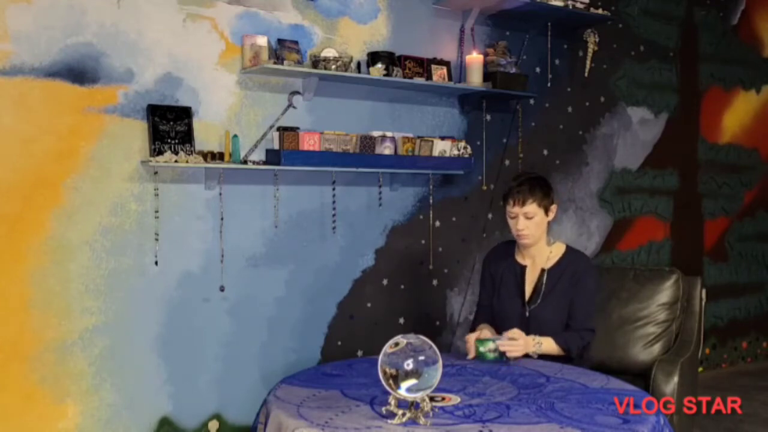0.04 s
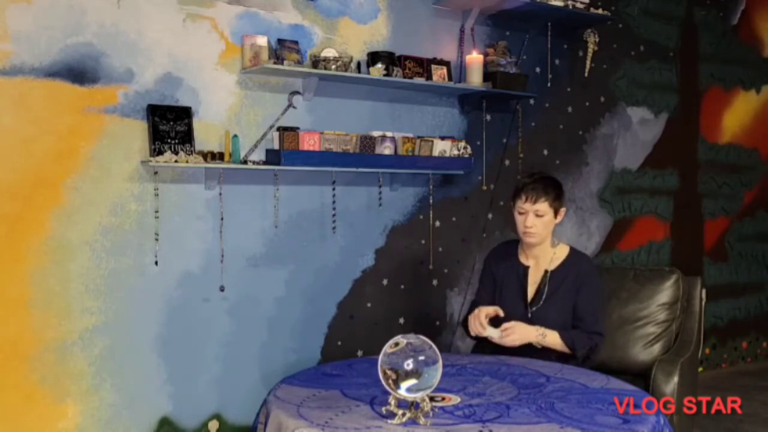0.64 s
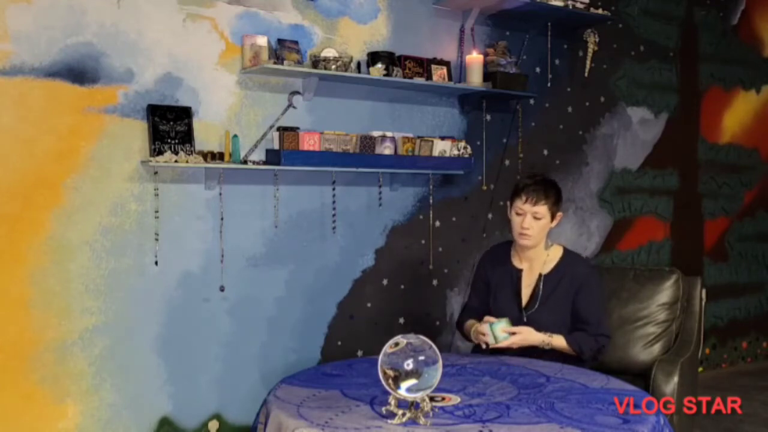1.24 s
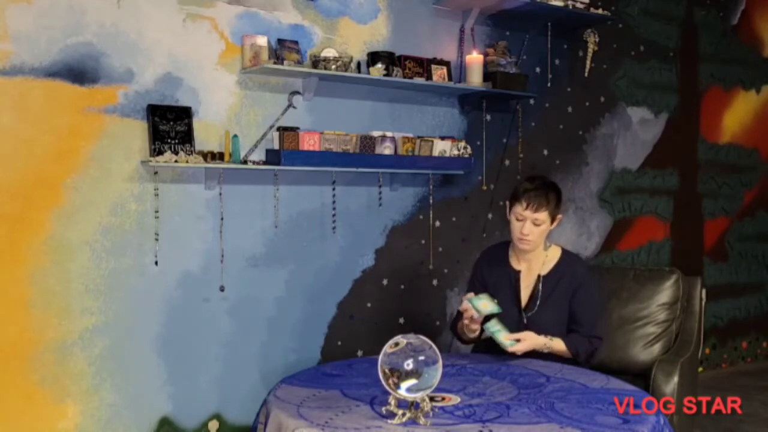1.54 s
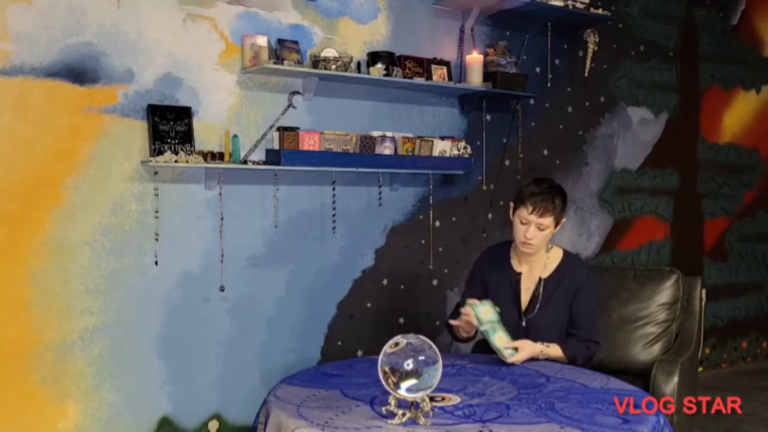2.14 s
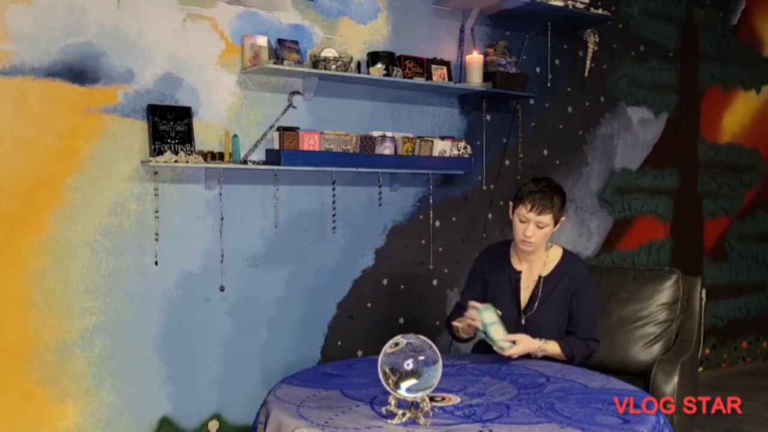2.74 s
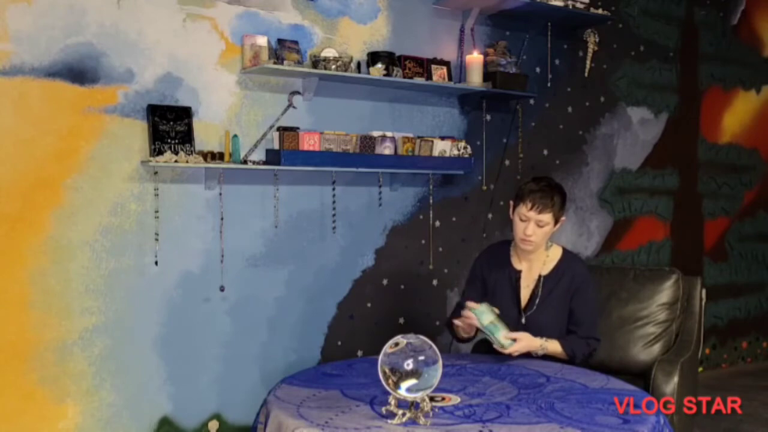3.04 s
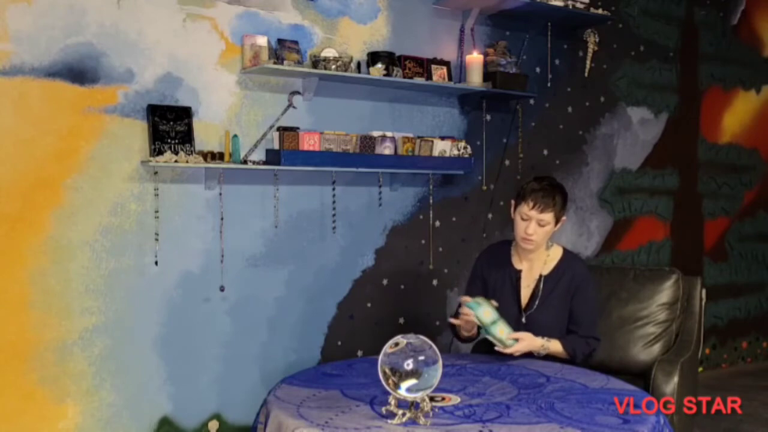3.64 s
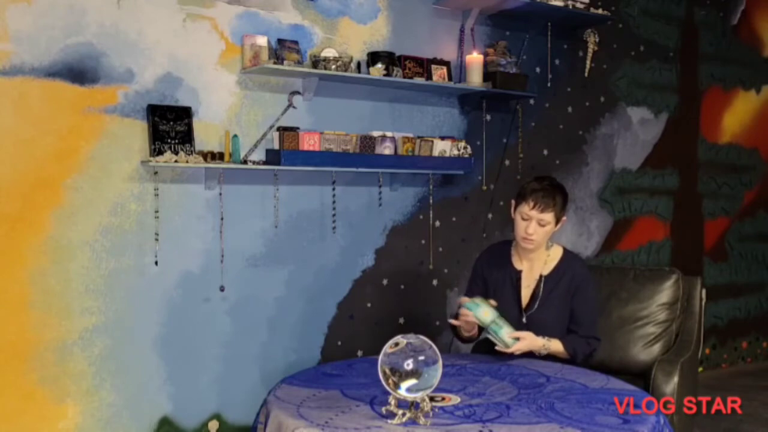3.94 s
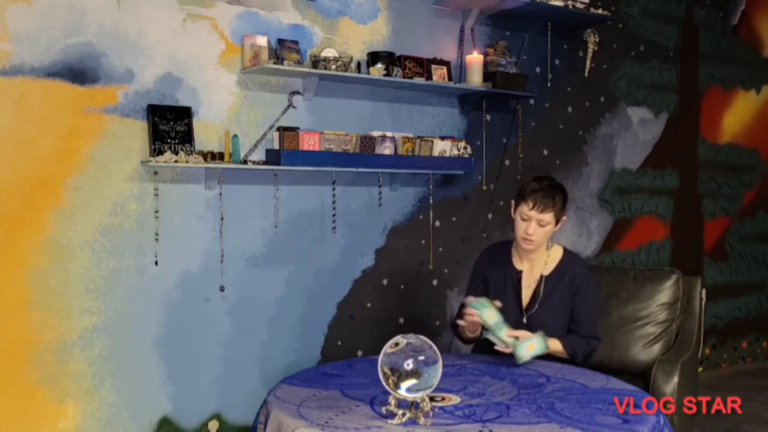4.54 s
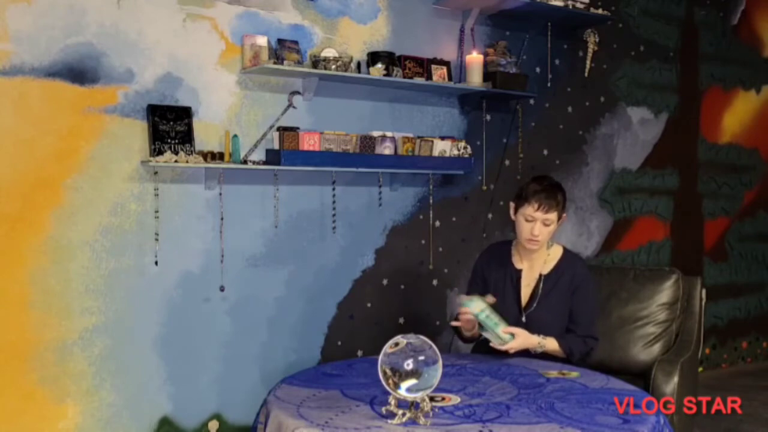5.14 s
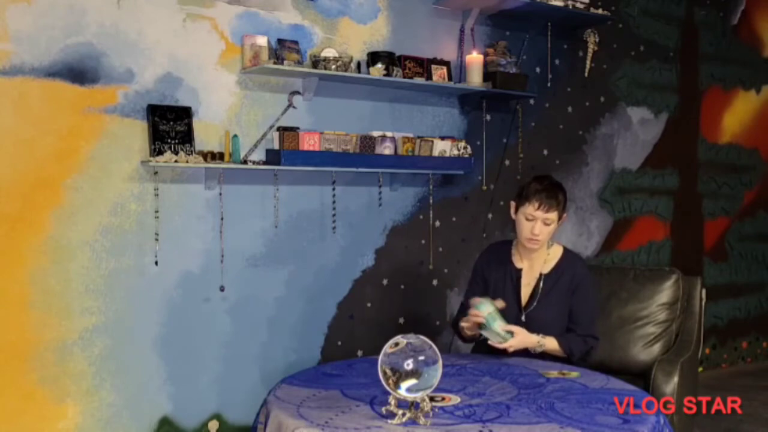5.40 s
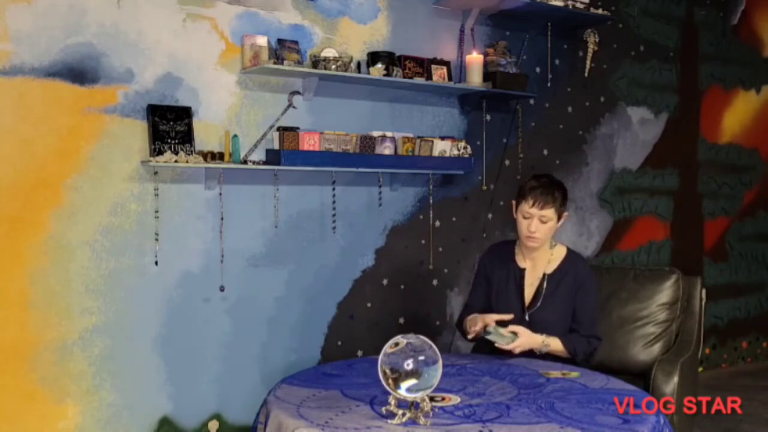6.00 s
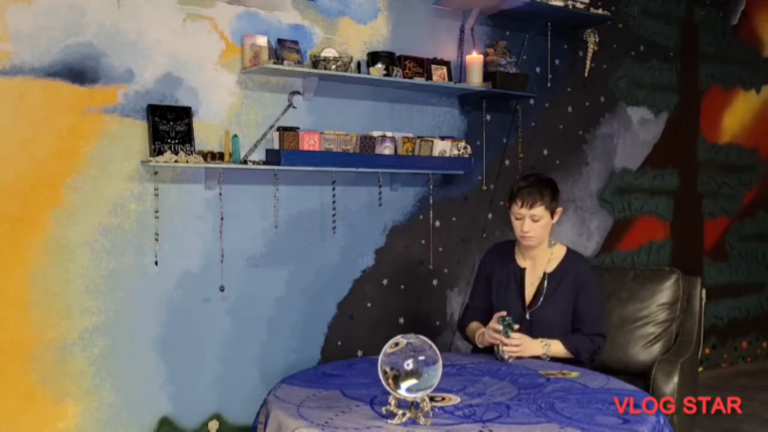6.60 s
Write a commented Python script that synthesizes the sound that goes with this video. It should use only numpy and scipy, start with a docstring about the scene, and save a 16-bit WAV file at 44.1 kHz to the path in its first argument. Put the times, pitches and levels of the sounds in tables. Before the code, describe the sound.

A deck of large cards is knocked square with one sharp, woody tap. After a short pause, cards slide across each other and an overhand shuffle begins: packets brush off with a papery hiss and slap onto the rest, with thin corner clicks. The strokes grow softer and end in light slides. The microphone is a few steps away in a small room, where a distant appliance hums faintly.

```python
"""A distant appliance rumbles and hums faintly throughout. A few steps away in a small room, a deck of
large cards is knocked square at 0.2 s. From 1.5 s cards slide across each other and an edge squeaks.
From 2.2 s the deck is shuffled overhand: packets slide off with a papery hiss and slap onto the cards
in the other hand, which now and then bumps the deck. The strokes grow softer after 4.6 s,
an edge squeaks again at 5.9 s, and the last light slides end by 6.8 s."""
import sys
import numpy as np
from scipy import signal
from scipy.fft import rfft, irfft
from scipy.io import wavfile

SR = 44100
rng = np.random.default_rng(int(sys.argv[2]) if len(sys.argv) > 2 else 0)


def bounce(signal):
    """Save signal as a 16-bit WAV file at the path given by the first command-line argument."""
    frames = np.transpose(np.atleast_2d(signal))
    limited = np.clip(frames, -1, 1)
    pcm = np.round(limited * 32767).astype(np.int16)
    wavfile.write(sys.argv[1], SR, pcm)


N = 302481
TIME_S = np.arange(N) / SR
FFT_SIZE = 8192
HZ = np.maximum(np.fft.rfftfreq(FFT_SIZE, 1 / SR), 1)

# room decay: (frequency [Hz], T60 [s])
ROOM_DECAY = [(80, 0.1), (250, 0.47), (600, 0.2367), (1500, 0.26), (3300, 0.253), (8000, 0.29),
              (15000, 0.3)]
# spectrum of sliding card: (frequency [Hz], level [dB])
FRICTION_SPECTRUM = [(200, -23), (700, -4), (2000, -4), (3400, 1), (4500, -1), (6500, 0.5), (8300, 0),
                     (9300, -6.5), (12000, -12), (15500, -6)]
# overhand strokes: a packet brushes in and lands, the deck is drawn off, the last corner lets go
# (time [s], clack [dB], ring [Hz], flutter [s], brush [dB], draw [dB], draw length [s], release [dB])
OVERHAND_STROKES = [(2.161, -28.5, 2000, .014, -40.5, -64, .136, -47.5),
                    (2.491, -60, 1010, 0.0044, -51.5, -70, .081, -76),
                    (2.573, -53.5, 1490, 0.0098, -68, -70, 0.036, -47.5),
                    (2.797, -28, 3120, .004, -43.5, -58, .122, -34.5),
                    (3.089, -37.5, 1890, .005, -44, -72, 0.14, -58.5),
                    (3.382, -31.5, 1880, .015, -52, -60, .095, -46),
                    (3.676, -40, 1120, 0.0028, -56, -63, 0.12, -49.5),
                    (3.975, -40.5, 1390, 0.0038, -54, -69.5, 0.13, -56),
                    (4.264, -49, 3400, 0.0064, -49, -70, .145, -52),
                    (4.41, -50.5, 1100, 0.0029, -55, -55.5, 0.041, -50),
                    (4.546, -35.5, 1410, .005, -62, -63.5, .129, -42.5),
                    (4.988, -50, 1620, 0.0032, -60, -89, 0.035, -91),
                    (5.174, -53.5, 1470, 0.007, -64, -71, .128, -59),
                    (5.58, -47.5, 3800, .004, -51.5, -75, .02, -78),
                    (5.747, -43.5, 1490, .005, -60, -63, 0.03, -60),
                    (5.784, -43, 1620, 0.0037, -72, -61, 0.057, -52),
                    (6.035, -58.5, 1300, 0.0047, -59.5, -66, 0.052, -76),
                    (6.338, -60.5, 2440, 0.0056, -74, -74.5, .105, -59.5)]


def from_db(db):
    """Decibels to gain."""
    return 10 ** (np.asarray(db) / 20)


def unit_energy(x):
    """Scale to energy 1."""
    return x / np.sqrt(np.sum(x ** 2) + 1e-20)


def unit_rms(x):
    """Scale to rms 1."""
    return x / np.sqrt(np.mean(x ** 2) + 1e-20)


def at_hz(points, hz):
    """Interpolate a table over log frequency."""
    points_hz, values = np.transpose(points)
    return np.interp(np.log(np.maximum(hz, 1)), np.log(points_hz), values)


def band(low_hz=0, high_hz=SR, order=2):
    """Band-pass gain with smooth skirts."""
    return ((1 + (low_hz / HZ) ** (2 * order)) * (1 + (HZ / high_hz) ** (2 * order))) ** -.5


def resonance_db(centre_hz, width_hz, lift_db):
    """Bell curve of one resonance."""
    return lift_db / (1 + (2 * (HZ - centre_hz) / width_hz) ** 2)


def pulse(gain):
    """Minimum-phase pulse with this spectrum."""
    cepstrum = irfft(np.log(gain + 1e-7))
    cepstrum[1:FFT_SIZE // 2] *= 2
    cepstrum[FFT_SIZE // 2 + 1:] = 0
    return irfft(np.exp(rfft(cepstrum)))[:FFT_SIZE // 2]


def add(track, time_s, sound):
    """Mix a sound into a track."""
    start = max(round(time_s * SR), 0)
    track[start:start + len(sound)] += sound[:N - start]


def drift(rate_hz):
    """Low-passed random wander, rms 1."""
    hz = np.fft.rfftfreq(N, 1 / SR)
    return unit_rms(irfft(rfft(rng.standard_normal(N)) / (1 + (hz / rate_hz) ** 2), N))


def diffuse_noise(size):
    """Frequencies and stereo spectrum of noise from all sides, correlated in the bass only."""
    # likeness of the channels: (frequency [Hz], correlation [1])
    correlation = [(60, 0.97), (150, 0.82), (300, 0.14), (600, 0), (1200, 0), (15000, 0)]
    hz = np.fft.rfftfreq(size, 1 / SR)
    mid, side = rfft(rng.standard_normal((2, size)))
    alike = np.clip(at_hz(correlation, hz), -1, 1)
    return hz, np.sqrt(1 + alike) * mid + np.sqrt(1 - alike) * side * [[1], [-1]]


def air_rumble(rms_db=-58.86):
    """Steady diffuse room noise, strongest in the bass."""
    # room air: (frequency [Hz], relative density [dB])
    air_spectrum = [(25, -24), (45, -15.5), (60, -6.5), (80, -4), (130, -12), (200, -10), (280, -10.5),
                    (550, -16), (1100, -22), (2000, -29), (3400, -30), (5000, -40.5), (7800, -43.5),
                    (9300, -56.5), (15500, -52)]
    hz, noise = diffuse_noise(N)
    return from_db(rms_db) * unit_rms(irfft(noise * from_db(at_hz(air_spectrum, hz)), N))


def appliance_hum(waver_db=2.0, wander_rad=0.5):
    """Tones of a distant appliance, wavering gently in level and phase."""
    # hum tones: (frequency [Hz], rms level [dB])
    tones = [(75.4, -67.5), (158, -75.5), (225, -65), (479, -83.5), (597.5, -79)]
    out = np.zeros(N)
    for hz, db in tones:
        amplitude = np.sqrt(2) * from_db(db - waver_db * drift(rate_hz=4.7))
        out += amplitude * np.sin(2 * np.pi * hz * TIME_S + wander_rad * drift(rate_hz=6))
    return out


def standing_waves(x):
    """Low room modes ring on, alike in both channels."""
    # modes between the walls: (frequency [Hz], gain [dB])
    modes = [(61, 4.5), (87, 17), (137, 9.5), (162, 6), (225, 6), (263, 8.5), (310, 1.5), (360, 5),
             (413, 1), (499, 7), (553, 4)]
    out = np.zeros(N)
    for k, (hz, db) in enumerate(modes):
        radius = from_db(-60 / (at_hz(ROOM_DECAY, hz) * SR))
        numerator = (1 - radius ** 2) / 2 * np.array([1, 0, -1])
        denominator = [1, -2 * radius * np.cos(2 * np.pi * hz / SR), radius ** 2]
        out += (-1) ** k * from_db(db) * signal.lfilter(numerator, denominator, x + 1e-18)
    return out


def reverberation(x, build_s=0.00053, bass_db=-5, bass_hz=350):
    """Dense stereo tail, decaying band by band, the upper bass last."""
    size = SR // 2
    time_s = np.arange(size) / SR
    hz, noise = diffuse_noise(size)
    noise *= from_db(bass_db / (1 + (hz / bass_hz) ** 4))   # standing waves carry most of the bass
    centres_hz = np.geomspace(60, 16000, 9)
    tail = 0
    for centre_hz, weights in zip(centres_hz, np.eye(len(centres_hz))):
        band_noise = irfft(noise * at_hz(list(zip(centres_hz, weights)), hz), size)
        tail += band_noise * from_db(-60 * time_s / at_hz(ROOM_DECAY, centre_hz))
    response = unit_energy(tail * (1 - np.exp(-time_s / build_s)))
    return signal.fftconvolve(x[None], response, axes=1)[:, :N]


def room(x, tail_db, early_db, left_db=-10.5, right_db=-5.5, sway_s=0.0003, sway_hz=.37):
    """Direct sound from the right; table and walls answer, differently as the hands move."""
    # near reflections: (delay [s], relative level [dB])
    reflections = [(.0051, -3), (.0083, -2), (0.012, -0.5), (0.0189, -5)]
    direct = np.array([from_db(left_db) * np.roll(x, 4), from_db(right_db) * x])
    early = np.zeros((2, N))
    for delay_s, db in reflections:
        for channel in early:
            shift_s = sway_s * np.sin(2 * np.pi * (sway_hz * TIME_S + rng.random()))
            channel += from_db(db + early_db) * np.interp(TIME_S - delay_s - shift_s, TIME_S, x)
    blend_rad = 2 * np.pi * sway_hz * TIME_S   # between two independent tails
    tail = np.cos(blend_rad) * reverberation(x) + np.sin(blend_rad) * reverberation(x)
    return direct + early + from_db([[tail_db - 0.5], [tail_db]]) * tail


def patter(strike, flutter_s, looseness, count):
    """The first card strikes; the rest follow at random, ever weaker. Energy 1."""
    lateness, strength = rng.exponential(1, count), rng.standard_normal(count)
    delay_samples = np.clip(lateness * flutter_s * SR, 1, FFT_SIZE - 1).astype(int)
    hits = np.zeros(FFT_SIZE)
    hits[0] = 1
    np.add.at(hits, delay_samples, looseness * strength * np.exp(-lateness / 2))
    return unit_energy(signal.fftconvolve(hits, strike))


def edge_squeaks(upper_ratio=1.68):
    """An edge sticks and slips, driving two bending modes of the card unsteadily."""
    # stick-slip bursts: (time [s], length [s], pitch [Hz], level [dB], upper mode re lower [dB])
    squeaks = [(1.855, 0.0089, 1855, -52, -7), (5.864, 0.011, 2094, -47, -29)]
    out = np.zeros(N)
    wander = .1 * drift(rate_hz=700)
    for time_s, length_s, hz, db, upper_db in squeaks:
        swell = np.sin(np.pi * np.clip((TIME_S - time_s) / length_s, 0, 1))
        phase = 2 * np.pi * hz * np.cumsum(1 + wander) / SR
        modes = np.sin(phase) + from_db(upper_db) * np.sin(upper_ratio * phase)
        out += 2 * from_db(db) * swell * modes
    return out


def corner_flicks(gain_db=20, landing_re_clack_db=-7.5):
    """A bent corner springs back with a thin tick and brushes its neighbours."""
    # lone corners flicking free: (time [s], level [dB])
    lone_flicks = [(0.451, -60), (1.79, -51.5)]
    stroke_flicks = []
    for time_s, clack_db, *_, draw_s, release_db in OVERHAND_STROKES:
        stroke_flicks += [(time_s, clack_db + landing_re_clack_db), (time_s + draw_s, release_db)]
    corner_db = resonance_db(centre_hz=8100, width_hz=900, lift_db=6)
    tick = pulse(from_db(at_hz(FRICTION_SPECTRUM, HZ) + corner_db) * band(low_hz=4200))
    out = np.zeros(N)
    for time_s, db in [*stroke_flicks, *lone_flicks]:
        flick = patter(tick, flutter_s=0.0019, looseness=0.85, count=6)
        add(out, time_s, from_db(db + gain_db) * flick)
    return out


def stroke_rubs(draw_delay_s=.02, tilt_db_per_octave=-2.5):
    """A packet brushes in, earlier and longer if loose; then the deck is drawn off."""
    for time_s, _, _, flutter_s, brush_db, draw_db, draw_s, _ in OVERHAND_STROKES:
        yield time_s - 1.9 * flutter_s, 5.07 * flutter_s, brush_db, tilt_db_per_octave
        yield time_s + draw_delay_s, draw_s, draw_db, tilt_db_per_octave


def card_slides(gain_db=2, catches_per_s=5000, grain_db=6.0, pressure_db=4.0, pivot_hz=5000):
    """Paper fibres catch and let go under uneven finger pressure; each rub swells fast and eases off."""
    # slides as the deck is squared or cut: (time [s], length [s], level [dB], tilt [dB/octave])
    squaring_rubs = [(0.182, .04, -56.5, -4), (1.515, 0.2, -71, 0.5), (1.586, 0.055, -57.5, -0.5),
                     (1.768, 0.17, -69, -3), (1.925, 0.055, -44, 2), (4.862, 0.05, -63.5, -4.5),
                     (4.93, 0.062, -72, 1), (5.275, 0.039, -51.5, 6.5), (5.427, 0.062, -52.5, -1.5),
                     (5.506, 0.11, -66, -0.5), (6.613, 0.08, -64.5, -6), (6.747, 0.03, -61, -4.5)]
    sizes = from_db(grain_db * np.minimum(rng.exponential(1, N), 5)) * rng.choice([-1, 1], N)
    catches = sizes * (rng.random(N) < catches_per_s / SR)
    grains = unit_rms(catches * from_db(pressure_db * drift(rate_hz=86)))
    out = np.zeros(N)
    for time_s, length_s, db, tilt_db_per_octave in [*stroke_rubs(), *squaring_rubs]:
        progress = np.linspace(0, 1, max(int(length_s * SR), 2))
        swell = np.abs(np.sin(np.pi * progress ** 0.77)) ** 1.38
        rub = swell * np.take(grains, int(time_s * SR) + np.arange(len(swell)), mode="wrap")
        colour_db = at_hz(FRICTION_SPECTRUM, HZ) + tilt_db_per_octave * np.log2(HZ / pivot_hz)
        response = unit_energy(pulse(from_db(colour_db) * band(low_hz=300)))
        add(out, time_s, from_db(db + gain_db) * signal.fftconvolve(rub, response))
    return out


def deck_knocks(gain_db=28, edge_db=-46):
    """The deck lands almost as one block: a soft thump and a woody clack, shaped by its resonances."""
    # deck knocked square or bumped by the hand:
    # (time [s], level [dB], thump low [Hz], thump high [Hz], clack re thump [dB], looseness [1])
    knocks = [(0.1933, -19.5, 170, 1080, -16, 0.19), (2.162, -40, 550, 596, -14, 0.044),
              (4.623, -31.5, 272, 1280, -0.5, .03), (4.749, -48, 228, 930, -13.5, 0.86),
              (5.303, -53.5, 497, 1000, -8.5, 0.92), (6.665, -52.5, 200, 650, -20, 0.88)]
    # resonances of deck and cupped hand: (centre [Hz], width [Hz], lift [dB])
    resonances = [(395, 110, 3.5), (539, 58, 3), (870, 270, -2.5), (1300, 280, 3.5), (2500, 770, 0)]
    body = from_db(sum(resonance_db(*row) for row in resonances))
    clack = unit_energy(body * band(low_hz=1100) * band(high_hz=2900, order=9))
    edge = from_db(edge_db) * unit_energy(band(low_hz=2600, high_hz=6100, order=3))
    out = np.zeros(N)
    for time_s, db, low_hz, high_hz, clack_db, looseness in knocks:
        thump = unit_energy(body * band(low_hz) * band(high_hz=high_hz, order=7))
        power = thump ** 2 + (from_db(clack_db) * clack) ** 2 + edge ** 2
        blow = pulse(np.sqrt(len(HZ) * power))
        knock = patter(blow, flutter_s=.004, looseness=looseness, count=12)
        add(out, time_s, from_db(db + gain_db) * knock)
    return out


def landings(medium_db=-39.5, tap_hz=1390, tap_flutter_s=.0045):
    """Two per stroke: (time [s], clack [dB], thud [dB], edge [dB], ring [Hz], flutter [s])."""
    for time_s, clack_db, ring_hz, flutter_s, _, _, draw_s, release_db in OVERHAND_STROKES:
        # the packet lands; its thud varies less than its clack
        thud_db = medium_db - 10 + 0.57 * (clack_db - medium_db)
        yield time_s, clack_db, thud_db, clack_db - 18.5, ring_hz, flutter_s
        # the freed card drops back with a tap
        tap_db = -52 + 0.47 * (release_db - medium_db)
        yield time_s + draw_s, tap_db, tap_db - 0.5, release_db - 15, tap_hz, tap_flutter_s


def packet_slaps(gain_db=25, loose_s=0.013):
    """A packet drops: its mass thuds, its cards clack at a pitch set by the grip, its edges crackle."""
    # spectrum of a landing packet: (frequency [Hz], level [dB])
    packet_spectrum = [(150, -12), (350, -15), (520, -9), (850, -4.5), (1250, 0), (1650, 0.5), (2150, -6),
                       (3000, -1.5), (4400, -12), (6000, -13), (8300, -9), (9500, -33), (15500, -25)]
    out = np.zeros(N)
    for time_s, clack_db, thud_db, edge_db, ring_hz, flutter_s in landings():
        grip_db = resonance_db(ring_hz, width_hz=0.52 * ring_hz, lift_db=5)
        colour = from_db(at_hz(packet_spectrum, HZ) + grip_db)
        thud = unit_energy(pulse(colour * band(low_hz=380, high_hz=718, order=5)))
        card = pulse(colour * band(low_hz=1050, high_hz=5650, order=5))
        edge = pulse(colour * band(low_hz=4500, order=5))
        clack = patter(card, flutter_s, looseness=flutter_s / loose_s, count=18)
        crackle = patter(edge, flutter_s, looseness=0.86, count=8)
        for db, part in [(thud_db, thud), (clack_db, clack), (edge_db, crackle)]:
            add(out, time_s, from_db(db + gain_db) * part)
    return out


def scene():
    """One pair of hands over the background; the thin ticks beam forward and stir the room less."""
    cards = deck_knocks() + packet_slaps() + card_slides() + edge_squeaks()
    cards_in_room = room(cards, tail_db=1.5, early_db=-9) + standing_waves(cards)
    ticks_in_room = room(corner_flicks(), tail_db=-9.5, early_db=-15.5)
    return cards_in_room + ticks_in_room + air_rumble() + appliance_hum()


def record(dry):
    """Steep low-pass."""
    cutoff_hz = 15900
    return signal.sosfilt(signal.ellip(12, .1, 80, cutoff_hz, fs=SR, output="sos"), dry)


dry = scene()
out = record(dry)
bounce(out)
```